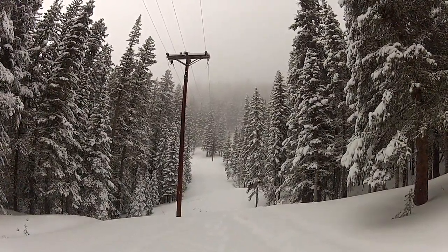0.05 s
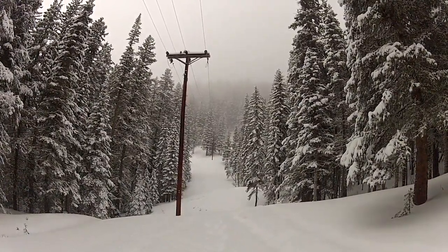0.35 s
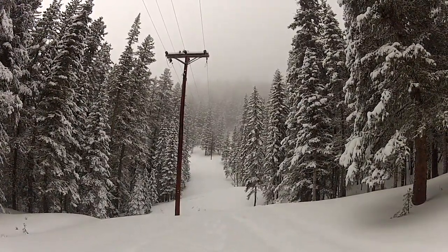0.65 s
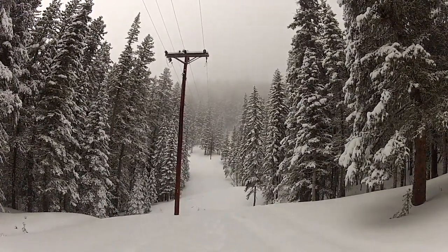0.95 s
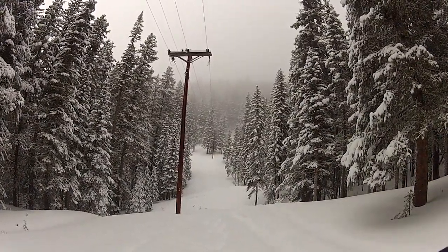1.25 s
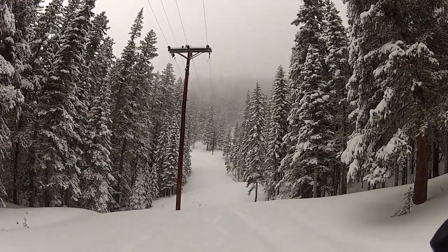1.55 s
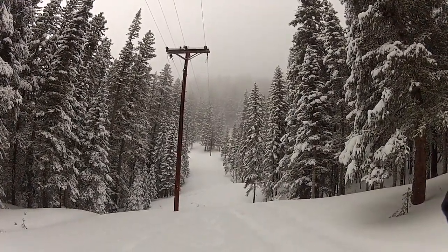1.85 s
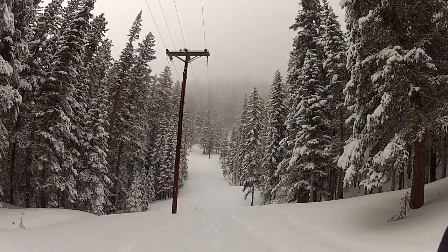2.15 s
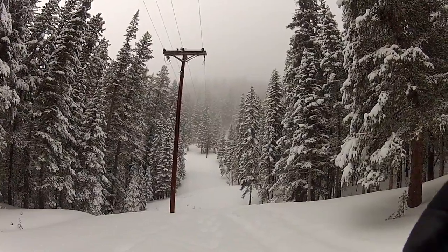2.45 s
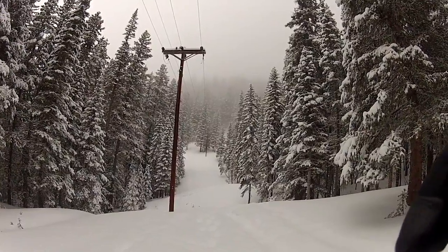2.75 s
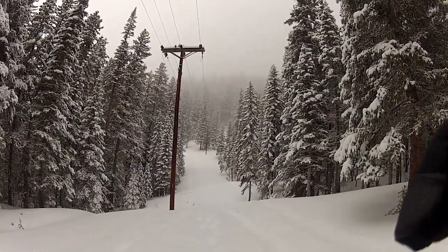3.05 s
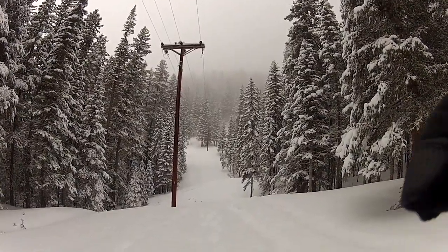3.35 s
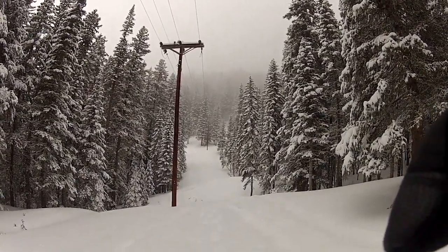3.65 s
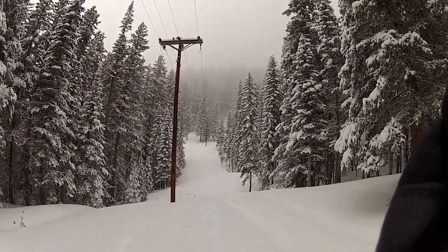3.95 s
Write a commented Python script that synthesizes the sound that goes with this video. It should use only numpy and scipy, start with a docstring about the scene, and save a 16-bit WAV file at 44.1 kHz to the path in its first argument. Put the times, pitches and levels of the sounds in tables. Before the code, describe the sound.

A glove rubs, crunches and knocks on the microphone after quiet hiss in snowy woods.

```python
"""A snowy glove rubbing over a small body-worn camera, right at the microphone, in still winter woods.
At first there is only faint hiss, a little clothing and soft, regular thuds, probably the wearer's pulse.
Then the glove brushes and drags over the housing with a crunchy stick-slip grain,
knocks against the case close to the microphone, and catches once in a short creak."""
import sys
import numpy as np
from scipy import signal
from scipy.fft import rfft, irfft
from scipy.io import wavfile
from scipy.ndimage import uniform_filter1d

SR = 44100
rng = np.random.default_rng(int(sys.argv[2]) if len(sys.argv) > 2 else 0)


def dump_mix(stems):
    """Bounce the given channels to the path in sys.argv[1] as a 16-bit WAV at rate SR."""
    frames = np.atleast_2d(stems).T  # one column per channel
    limited = np.clip(frames, -1, 1)  # hard clip at full scale
    pcm = np.round(limited * 32767).astype(np.int16)
    wavfile.write(sys.argv[1], SR, pcm)


N = 176400

# spectrum of the hiss: frequency_hz, relative_db
HISS_SPECTRUM = [(12, -27), (20, 3.5), (77, -4.5), (113, -6.5), (134, -4), (216, -10.5), (285, -9),
                 (590, -17.5), (1400, -24), (1710, -24), (4940, -30.5), (6010, -37.5), (7110, -32.5),
                 (13900, -44), (16000, -86)]
# beats felt through the camera: start_s, thud_db, flutter_db
PULSE_BEATS = [(-0.025, -47.5, -54), (0.435, -47, -55), (0.903, -46.5, -54.5), (1.347, -42.5, -59.5),
               (1.813, -46, -55), (2.26, -47.5, -56), (2.72, -51.5, -55.5), (3.18, -49, -59),
               (3.628, -44, -55)]
# knocks on the case: start_s, click_db, thud_db
CASE_KNOCKS = [(2.8233, -48, -35), (2.852, -47, -44), (3.515, -12, -8.5), (3.5158, -19, -16),
               (3.5182, -23, -20), (3.5245, -36, -38), (3.971, -28.5, -27), (3.9732, -20.5, -45)]

# short events close to the microphone: start_s, level_db
FABRIC_CRACKLES = [(0.077, -63), (0.266, -65.5), (0.353, -67), (0.541, -65), (0.728, -67), (0.828, -64),
                   (1.372, -64), (1.44, -65), (1.455, -66), (1.466, -63.5), (1.908, -65.5)]
MOUNT_BUMPS = [(0.076, -31.5), (1.436, -32.5), (1.908, -37.5), (3.208, -38.5), (3.5165, -21), (3.971, -27),
               (3.985, -45)]  # level before cushioning
FINGER_TAPS = [(3.139, -39.5), (3.640, -31)]
GLOVE_SNAGS = [(3.3915, -39), (3.4165, -23.5), (3.4225, -23), (3.4348, -25), (3.7465, -36), (3.7592, -39),
               (3.7715, -29)]
CREAK_SLIPS = [(3.7525, -33), (3.7738, -16), (3.7772, -30), (3.7805, -20), (3.7855, -41), (3.789, -28),
               (3.793, -25), (3.8, -51), (3.807, -35)]

# how the rubbing and shaking swell and fade: time_s, level_db
RUSTLE_LEVELS = [(0, -81), (0.3, -79), (0.55, -82), (0.7, -80.5), (1.25, -79.5), (1.38, -77), (1.47, -69),
                 (1.62, -82.5), (2.7, -83)]
RUMBLE_LEVELS = [(2.72, -74), (2.83, -47.5), (3.02, -52), (3.1, -56), (3.28, -59), (3.45, -52), (3.56, -46),
                 (3.7, -49.5), (3.77, -42), (3.85, -43.5), (3.93, -50), (4.0, -39)]
BRUSH_LEVELS = [
    [(2.820, -70), (2.823, -45.5), (2.83, -45.5), (2.876, -43), (2.91, -47), (2.94, -48.5), (2.976, -44),
     (2.995, -48), (3.017, -47), (3.03, -53.5), (3.085, -56), (3.12, -62.5), (3.26, -66.5)],
    [(3.49, -54.5), (3.525, -40), (3.548, -64), (3.568, -40.5), (3.585, -40.5), (3.602, -44.5),
     (3.615, -59), (3.65, -53.5), (3.668, -50.5), (3.72, -56.5), (3.83, -57), (3.89, -54), (3.95, -55.5),
     (4.0, -52)],
]  # one list per stroke
RASP_LEVELS = [(2.8205, -75), (2.823, -62), (2.838, -54.5), (2.855, -51), (2.88, -56), (2.9, -69),
               (3.0, -73)]
DRAG_LEVELS = [
    [(3.135, -64), (3.142, -56), (3.16, -54), (3.184, -50.5), (3.205, -66), (3.25, -64)],
    [(3.262, -53), (3.273, -48.5), (3.29, -42), (3.31, -39.5), (3.33, -39.5), (3.35, -40), (3.398, -33.5),
     (3.413, -35), (3.418, -32.5), (3.436, -35), (3.445, -38), (3.47, -40), (3.494, -51.5), (3.51, -61),
     (3.545, -48.5), (3.585, -40), (3.625, -52)],
    [(3.725, -52), (3.742, -50), (3.751, -32.5), (3.768, -40.5), (3.778, -32.5), (3.79, -37),
     (3.805, -39.5), (3.826, -50), (3.856, -48), (3.88, -57.5), (3.96, -54)],
]  # one list per stroke
SHUDDER_LEVELS = [(3.27, -62), (3.3, -56.5), (3.35, -51.5), (3.39, -46), (3.45, -43), (3.49, -61),
                  (3.53, -65)]

# resonances of the clothing: pitch_hz, width_hz, relative_db
RUSTLE_MODES = [(1840, 1100, 2), (3540, 810, -1.5), (5100, 2500, -8.5), (9640, 2200, -7.5),
                (14000, 1200, -15)]
CRACKLE_MODES = [(1750, 690, 3.5), (2260, 320, -1), (3170, 730, -12.5)]
# low resonances of the camera on its mount: pitch_hz, width_hz, relative_db
FLUTTER_MODES = [(69, 30, 4.5), (140, 77, -4.5)]
BUMP_MODES = [(44, 66, 1.6), (99, 86, 1.9), (174, 125, -0.54)]
RUMBLE_MODES = [(42.3, 45, 8.5), (85, 120, -5.5)]
SHUDDER_MODES = [(152, 83, 0.37), (229, 103, -2.4)]
# resonances of the housing under each kind of touch: pitch_hz, width_hz, relative_db
BRUSH_MODES = [(170, 196, -3.5), (850, 72, -7.5), (1153, 260, -0.5), (1450, 320, -8.5), (1756, 420, -2),
               (2320, 236, 2.5), (2720, 870, -6), (3660, 410, -12), (5040, 3700, -21.5), (8400, 1600, -19),
               (9650, 630, -10.5), (10500, 530, -24), (14270, 1100, -14.5)]
RASP_MODES = [(4040, 1400, 0), (5360, 2200, -0.47), (7100, 1800, -2.4)]
CLICK_MODES = [(1630, 370, -6.5), (2450, 410, 4.5), (2670, 270, -2.5), (3520, 250, -8), (6460, 3000, -23),
               (9440, 860, -8.5), (11000, 260, -14.5), (14350, 1400, -11.5)]
THUD_MODES = [(184, 157, -1), (410, 460, -6.5), (1198, 210, -6), (1570, 250, -8.5), (1930, 180, -4),
              (2150, 190, -13)]
DRAG_MODES = [(157, 110, -7), (262, 150, -15.5), (524, 130, -20), (635, 48, -6.5), (785, 100, -6),
              (1026, 166, -6.5), (1165, 230, -5), (1622, 173, 0), (1798, 180, -3), (2094, 200, -9.5),
              (2690, 1000, -17.5), (3710, 330, -13), (5080, 910, -22.5), (6750, 940, -26)]
SIZZLE_MODES = [(8260, 260, 1.5), (9200, 1000, -7), (10440, 530, 4), (13250, 440, 3), (14600, 700, -14)]  # its thin upper ring
TAP_MODES = [(200, 330, -2), (606, 93, 7), (1040, 400, -3.5), (1680, 310, -7)]
SQUEAK_MODES = [(1622, 75, 0), (1757, 60, -7), (1830, 60, -10), (3750, 160, -19), (10380, 200, -21)]
CREAK_MODES = [(447, 96, -12), (566, 48, -11), (671, 48, 2), (857, 30, 1.5), (953, 55, 0.5),
               (1015, 45, 3.5), (1133, 160, -2.5), (1626, 110, -13), (2940, 1600, -41)]

# narrow dips in the microphone's response: centre_hz, width_hz
MIC_DIPS = [(6020, 670), (12000, 670)]


def undb(db):
    """Decibels to gain."""
    return 10 ** (np.asarray(db) / 20)


def unit(x):
    """Scale to rms 1."""
    return x / np.sqrt(np.mean(x ** 2))


def curve(points):
    """Gain along (time_s, level_db) points, silent outside them."""
    time_s, level_db = np.array(points).T
    return undb(np.interp(np.arange(N) / SR, time_s, level_db, left=-140, right=-140))


def swell(start_s, attack_s, hold_s, release_s):
    """Attack, hold and release envelope."""
    corners_s = start_s + np.cumsum([0, attack_s, hold_s, release_s])
    return np.interp(np.arange(N) / SR, corners_s, [0, 1, 1, 0])


def wander(rate_hz):
    """Smooth random wander with spread 1."""
    step = max(int(SR / rate_hz), 2)
    return unit(uniform_filter1d(rng.standard_normal(N)[np.arange(N) // step], step))


def ring(modes, size=8192, steepness=1.72):
    """Impulse response, peak 1, of a body with these resonances."""
    hz = np.maximum(np.arange(size // 2 + 1) * SR / size, 1)
    power = sum(undb(db) ** 2 / (1 + ((hz - pitch_hz ** 2 / hz) / width_hz) ** 2) ** steepness
                for pitch_hz, width_hz, db in modes)
    cepstrum = irfft(np.log(power + 1e-12) / 2)
    cepstrum[1:size // 2] *= 2  # fold to minimum phase, so the ring follows the blow
    cepstrum[size // 2 + 1:] = 0
    response = irfft(np.exp(rfft(cepstrum)))
    return response / np.abs(response).max()


def excite(force, modes):
    """Pass a force through a body."""
    return signal.fftconvolve(force, ring(modes))[:N]


def strike(blows, modes):
    """One sharp push on a body for each (start_s, level_db) row."""
    force = np.zeros(N)
    for start_s, level_db in blows:
        force[int(np.clip(start_s * SR, 0, N - 1))] += undb(level_db)
    return excite(force, modes)


def friction(slips_per_s=2200, spread_db=2, fibre_gain=0.64, judder_hz=170, judder_db=0.8):
    """Dense little slips of uneven size over a smooth hiss of fibres, coming in judders."""
    slips = (rng.random(N) < slips_per_s / SR) * rng.choice([-1, 1], N)
    sizes = undb(spread_db * np.minimum(rng.exponential(size=N), 5))
    fibres = fibre_gain * rng.standard_normal(N)
    return (unit(slips * sizes) + fibres) * undb(judder_db * wander(judder_hz))


def rub(modes):
    """A body sounded by steady friction, at rms 1."""
    return unit(excite(friction(), modes))


def hiss(level_db=-61.5):
    """A steady, dark hiss lies under everything."""
    points_hz, points_db = np.array(HISS_SPECTRUM).T
    hz = np.maximum(np.arange(N // 2 + 1) * SR / N, 1)
    colour = undb(np.interp(np.log(hz), np.log(points_hz), points_db))
    return undb(level_db) * unit(irfft(rfft(rng.standard_normal(N)) * colour, N))


def pulse(pitch_hz=32.9):
    """Each beat rocks the camera for a few slow cycles, with a low flutter on top."""
    t, beats = np.arange(N) / SR, np.zeros(N)
    flutter = unit(excite(rng.standard_normal(N), FLUTTER_MODES))
    for start_s, thud_db, flutter_db in PULSE_BEATS:
        rocking = np.sin(2 * np.pi * pitch_hz * (t - start_s))
        beats += undb(thud_db) * rocking * swell(start_s, 0.034, 0.06, 0.077)
        beats += undb(flutter_db) * flutter * swell(start_s, 0.011, 0.035, 0.11)
    return beats


def clothing():
    """Cold fabric near the microphone rustles faintly and crackles now and then."""
    crackles = sum(undb(db) * swell(start_s, 0.0009, 0.0017, 0.0054) for start_s, db in FABRIC_CRACKLES)
    return rub(RUSTLE_MODES) * curve(RUSTLE_LEVELS) + rub(CRACKLE_MODES) * crackles


def mount_bumps(cutoff_hz=286):
    """Cushioned bumps of the mount: only the low end reaches the microphone."""
    cushion = signal.butter(2, cutoff_hz, fs=SR, output="sos")
    return signal.sosfilt(np.vstack([cushion, cushion]), strike(MOUNT_BUMPS, BUMP_MODES))


def handling_rumble():
    """The hand shakes the whole camera."""
    return unit(excite(rng.standard_normal(N), RUMBLE_MODES)) * curve(RUMBLE_LEVELS)


def glove_brush():
    """Light strokes sound the housing brightly, with an icy rasp as the glove first lands."""
    strokes = sum(curve(stroke) for stroke in BRUSH_LEVELS)
    return rub(BRUSH_MODES) * strokes + rub(RASP_MODES) * curve(RASP_LEVELS)


def case_knocks():
    """Hard knocks right beside the microphone, each a click with a thud beneath."""
    clicks = strike([(start_s, db) for start_s, db, _ in CASE_KNOCKS], CLICK_MODES)
    thuds = strike([(start_s, db) for start_s, _, db in CASE_KNOCKS], THUD_MODES)
    return clicks + thuds


def glove_drag(sizzle_db=-12.5):
    """Firm strokes ring the housing lower; the same friction stirs a thin sizzle on top."""
    force = friction()
    crunch = unit(excite(force, DRAG_MODES))
    sizzle = undb(sizzle_db) * unit(excite(force, SIZZLE_MODES))
    return (crunch + sizzle) * sum(curve(stroke) for stroke in DRAG_LEVELS)


def finger_taps():
    """A fingertip lands dully on the case."""
    return strike(FINGER_TAPS, TAP_MODES)


def mount_shudder():
    """The mount shudders low while the glove presses hardest."""
    return rub(SHUDDER_MODES) * curve(SHUDDER_LEVELS)


def glove_snags():
    """The dragging glove snags on the housing in tiny squeaks."""
    return strike(GLOVE_SNAGS, SQUEAK_MODES)


def glove_creak(sizzle_db=-15):
    """The glove catches, then lets go in a quick run of slips that ring the housing."""
    return strike(CREAK_SLIPS, CREAK_MODES) + undb(sizzle_db) * strike(CREAK_SLIPS, SIZZLE_MODES)


def scene():
    """The quiet bed and the close handling noise, all at the one microphone."""
    bed = hiss() + pulse() + clothing() + mount_bumps()
    first_touch = handling_rumble() + glove_brush() + case_knocks()
    firm_touch = glove_drag() + finger_taps() + mount_shudder() + glove_snags() + glove_creak()
    return (bed + first_touch + firm_touch)[None]


def record(dry, top_hz=15050):
    """The camera's microphone has two narrow dips, and the top is cut."""
    for centre_hz, width_hz in MIC_DIPS:
        dry = signal.lfilter(*signal.iirnotch(centre_hz, centre_hz / width_hz, fs=SR), dry)
    return signal.sosfilt(signal.ellip(8, .2, 70, top_hz, fs=SR, output="sos"), dry)


dry = scene()
out = record(dry)
dump_mix(out)
```